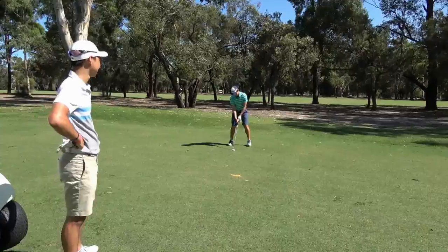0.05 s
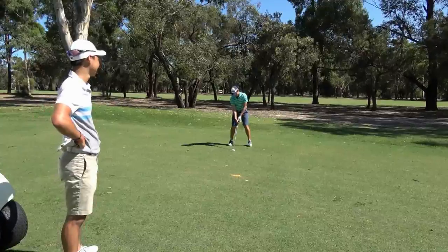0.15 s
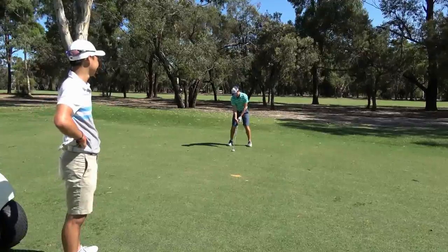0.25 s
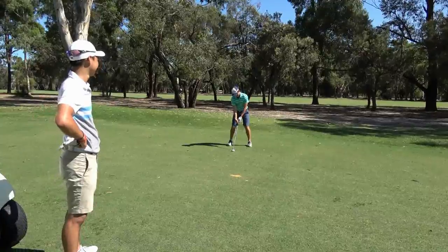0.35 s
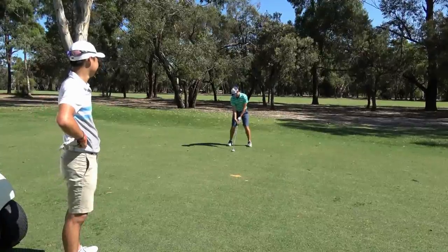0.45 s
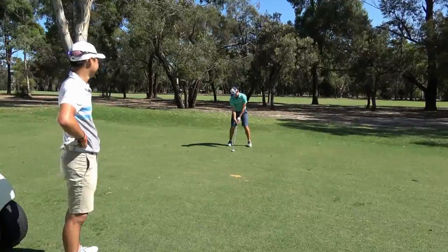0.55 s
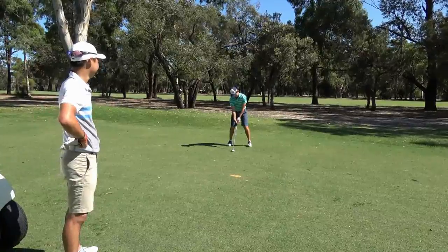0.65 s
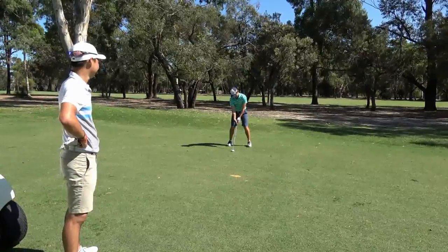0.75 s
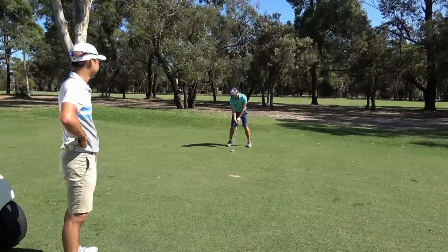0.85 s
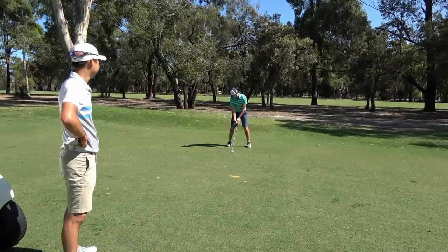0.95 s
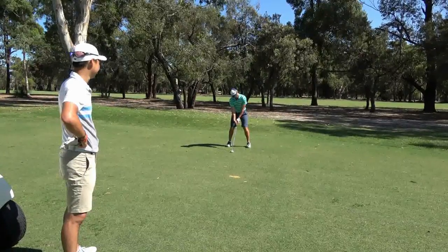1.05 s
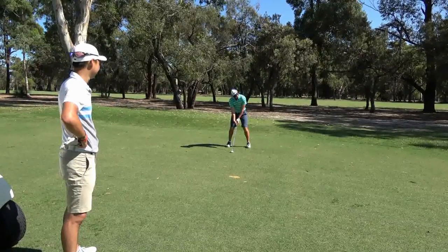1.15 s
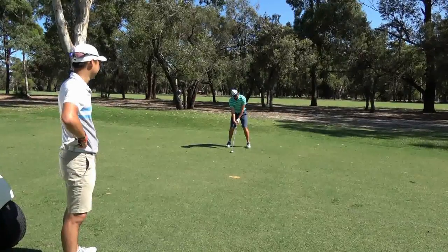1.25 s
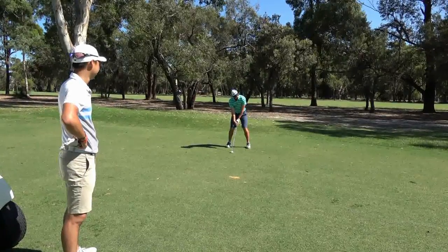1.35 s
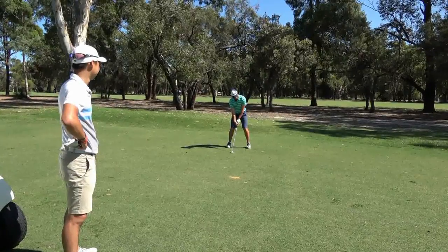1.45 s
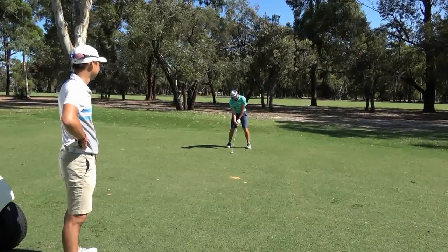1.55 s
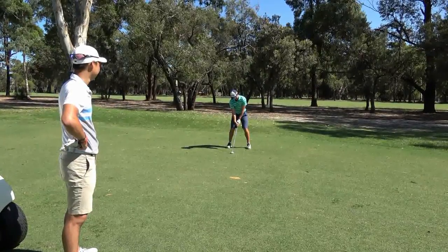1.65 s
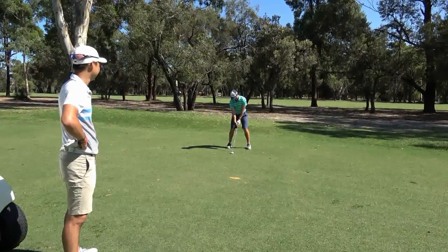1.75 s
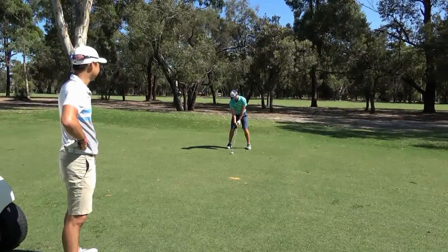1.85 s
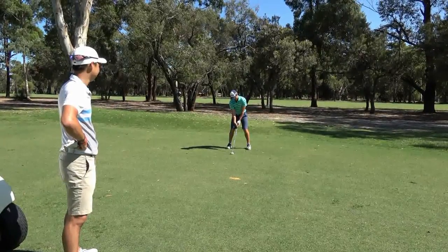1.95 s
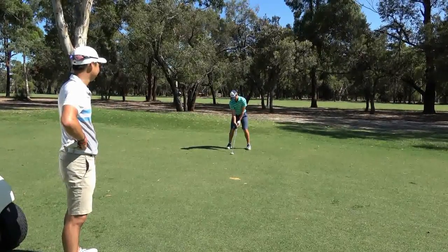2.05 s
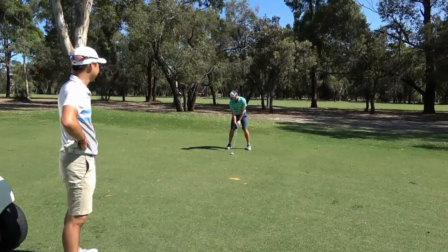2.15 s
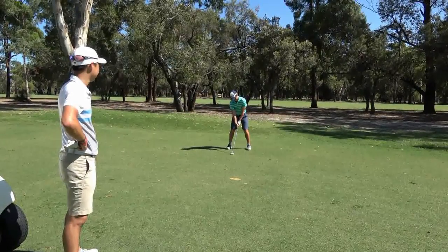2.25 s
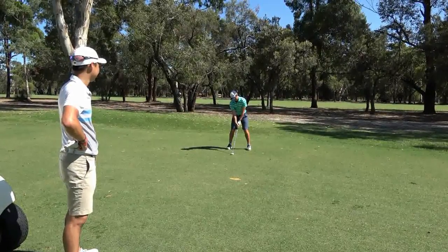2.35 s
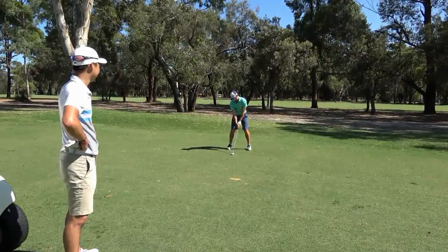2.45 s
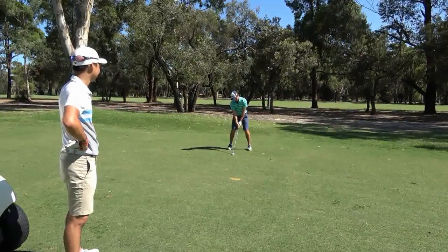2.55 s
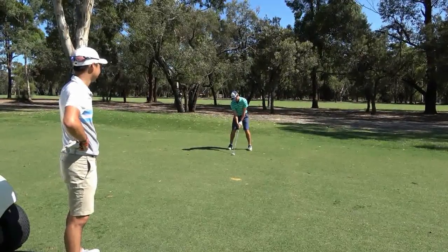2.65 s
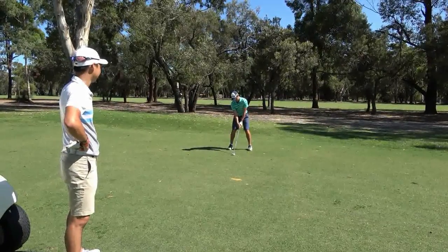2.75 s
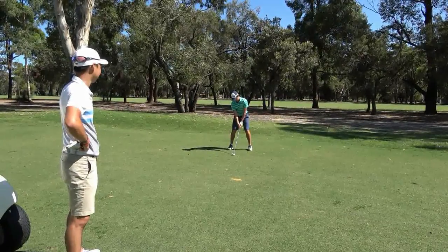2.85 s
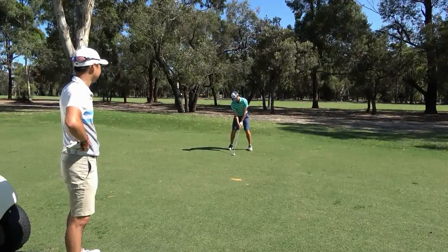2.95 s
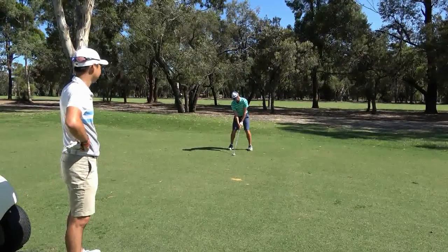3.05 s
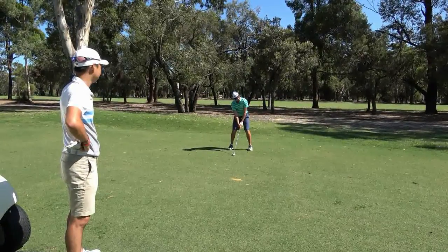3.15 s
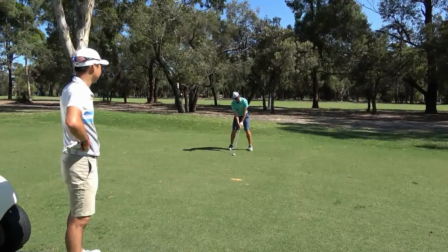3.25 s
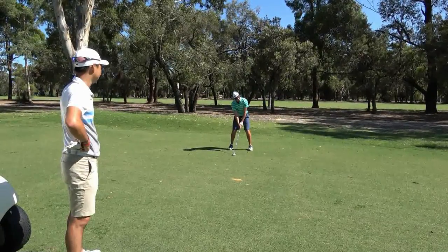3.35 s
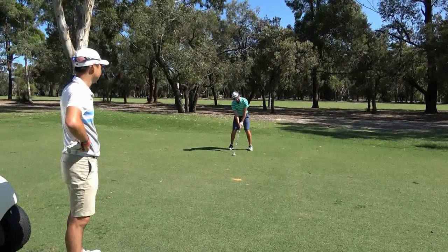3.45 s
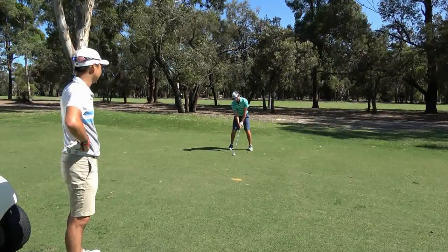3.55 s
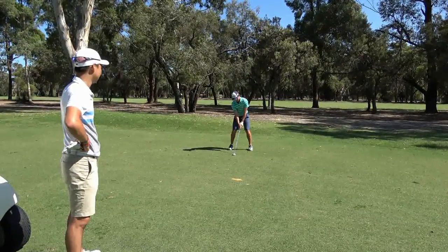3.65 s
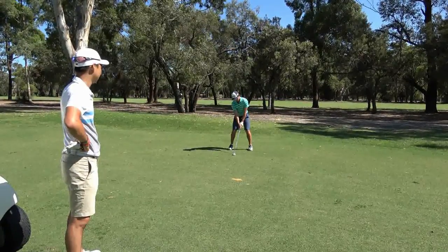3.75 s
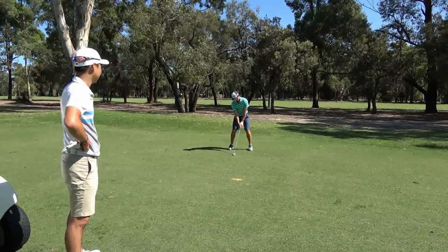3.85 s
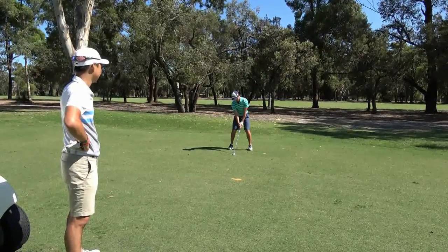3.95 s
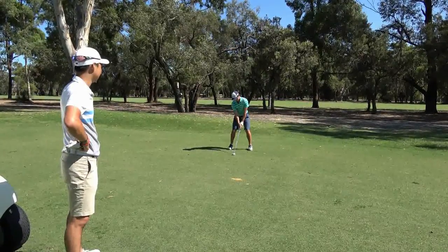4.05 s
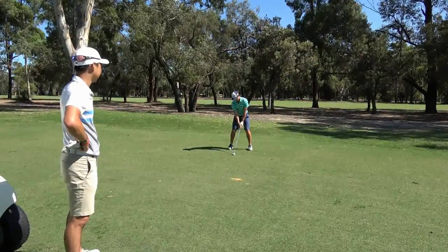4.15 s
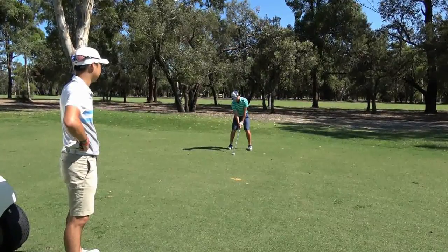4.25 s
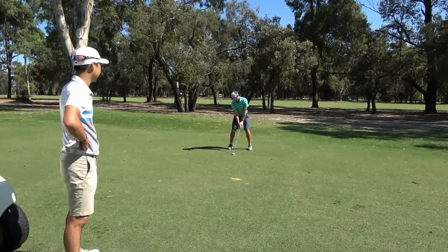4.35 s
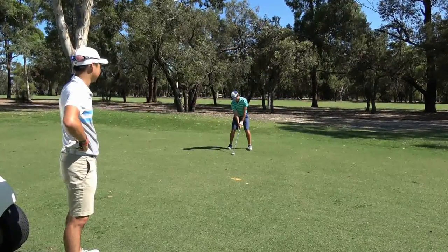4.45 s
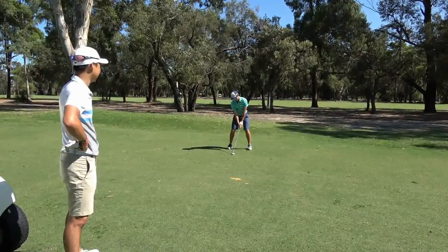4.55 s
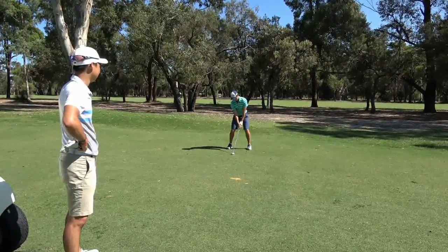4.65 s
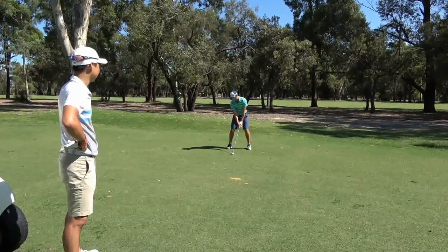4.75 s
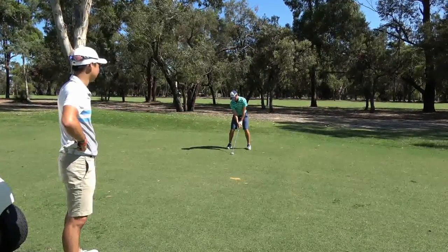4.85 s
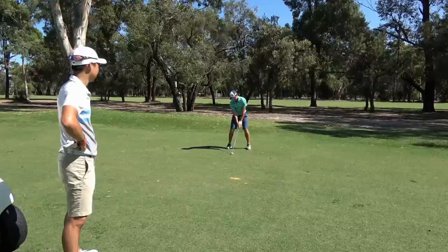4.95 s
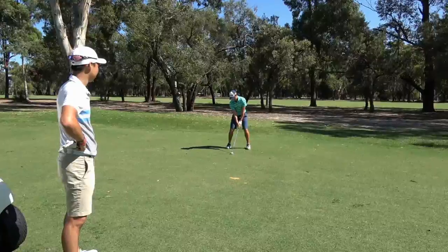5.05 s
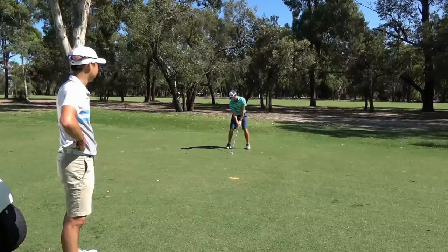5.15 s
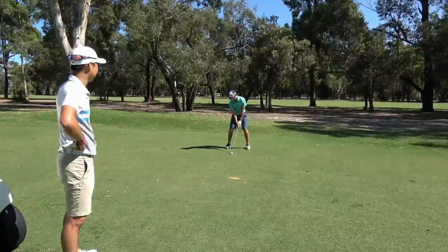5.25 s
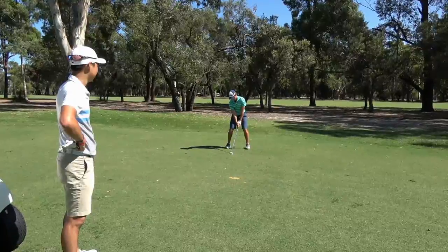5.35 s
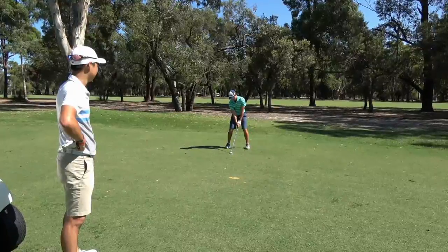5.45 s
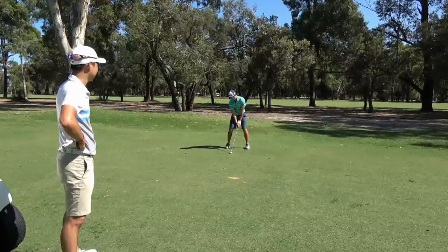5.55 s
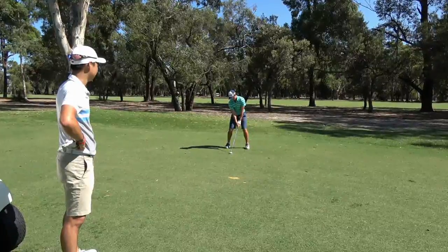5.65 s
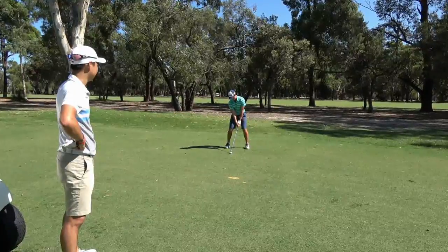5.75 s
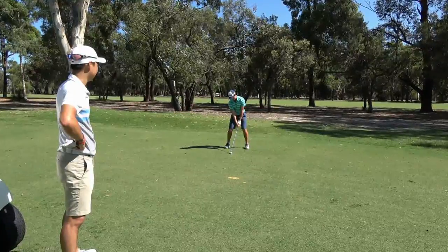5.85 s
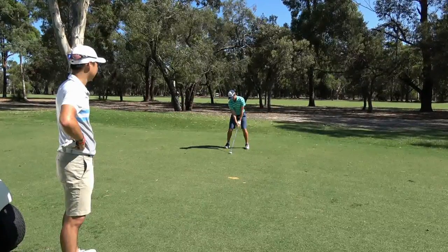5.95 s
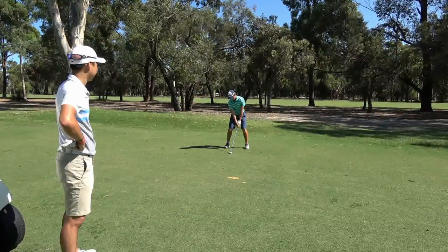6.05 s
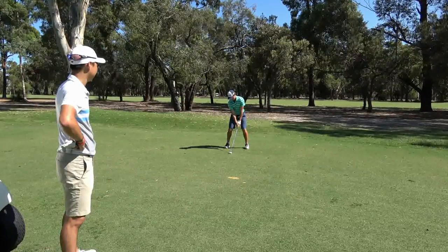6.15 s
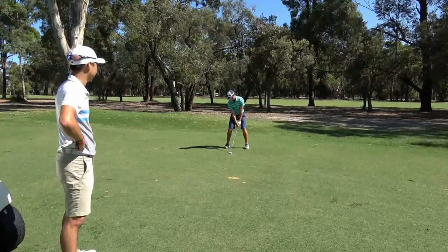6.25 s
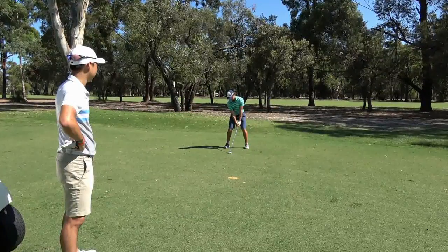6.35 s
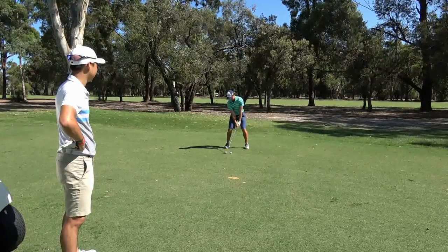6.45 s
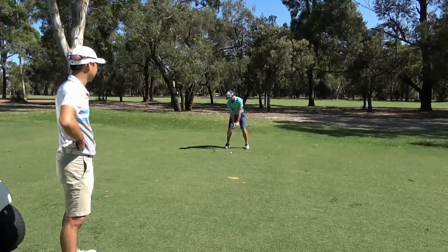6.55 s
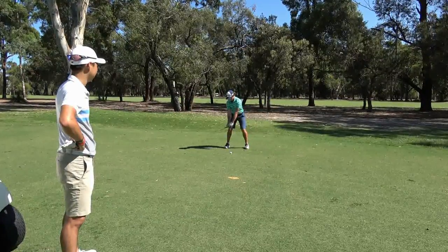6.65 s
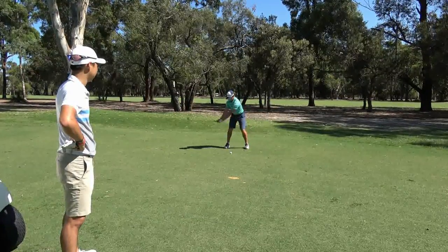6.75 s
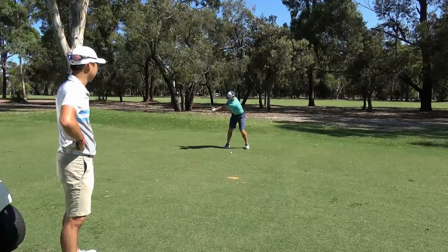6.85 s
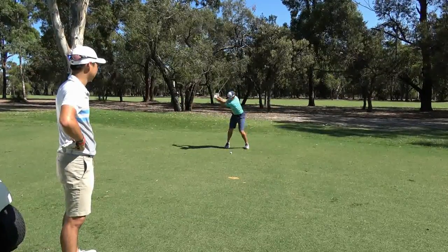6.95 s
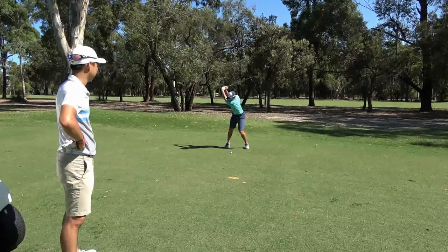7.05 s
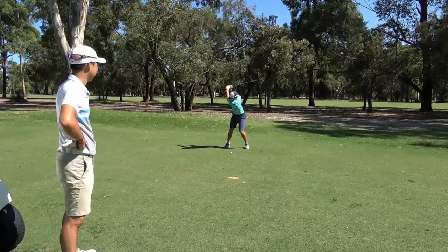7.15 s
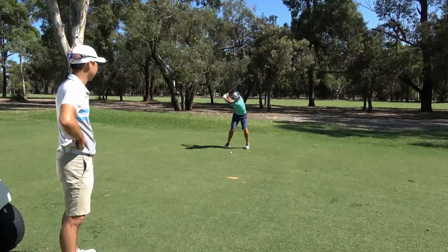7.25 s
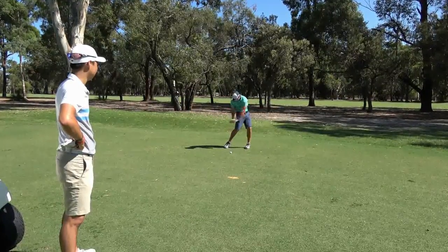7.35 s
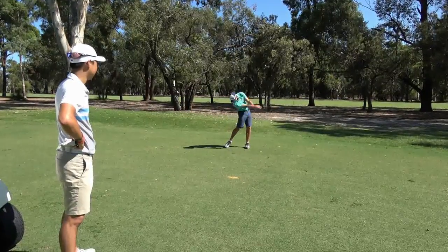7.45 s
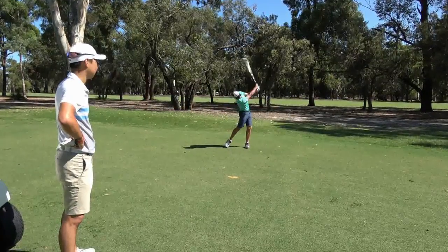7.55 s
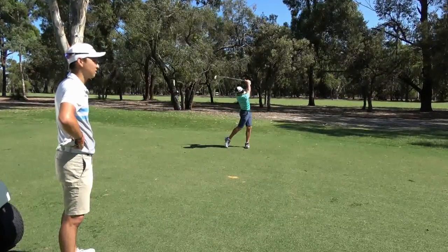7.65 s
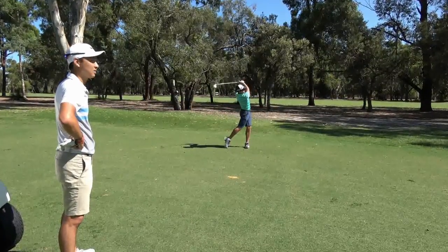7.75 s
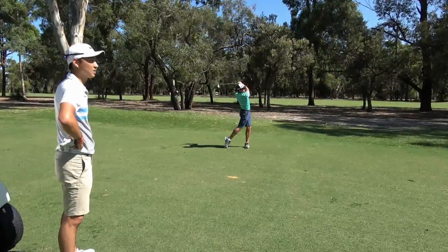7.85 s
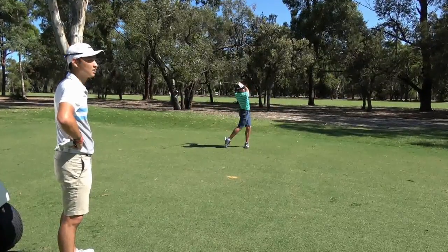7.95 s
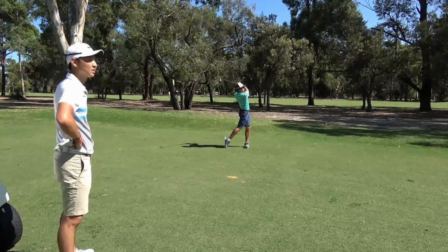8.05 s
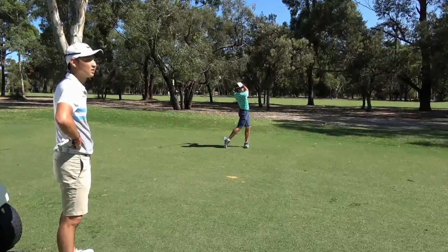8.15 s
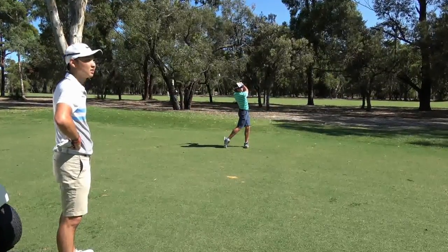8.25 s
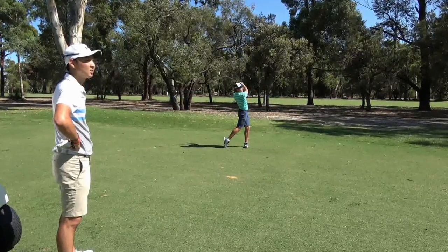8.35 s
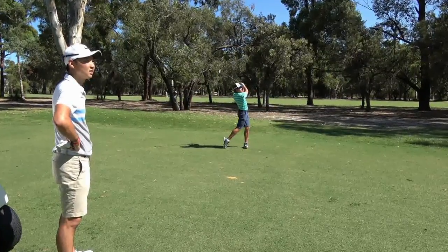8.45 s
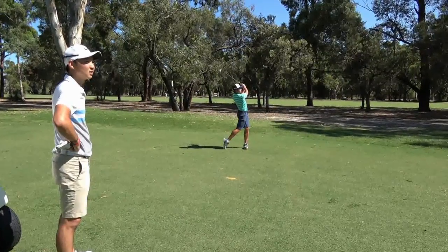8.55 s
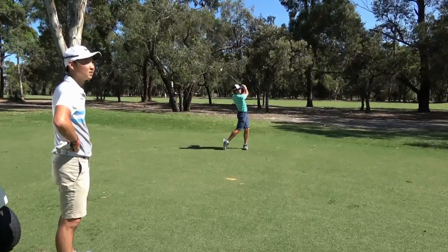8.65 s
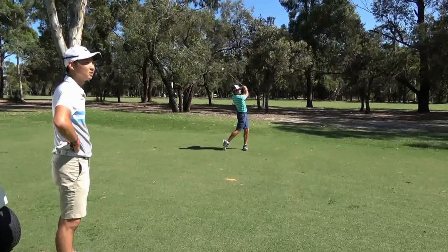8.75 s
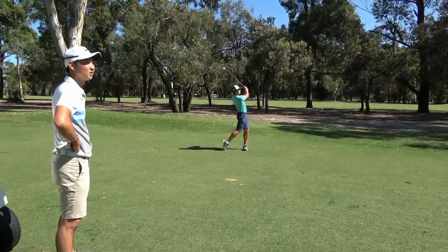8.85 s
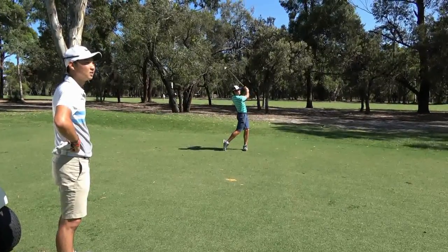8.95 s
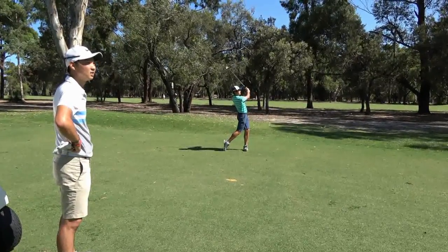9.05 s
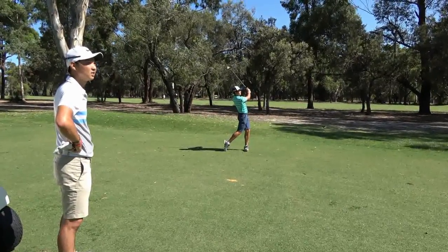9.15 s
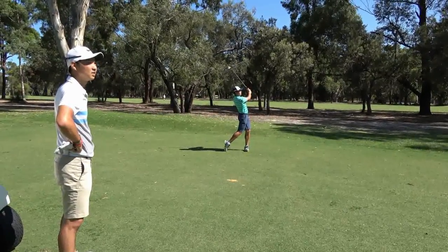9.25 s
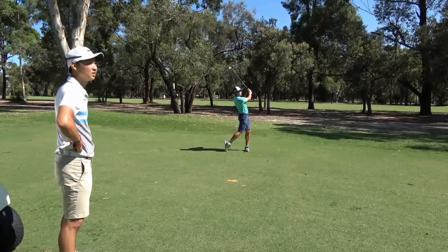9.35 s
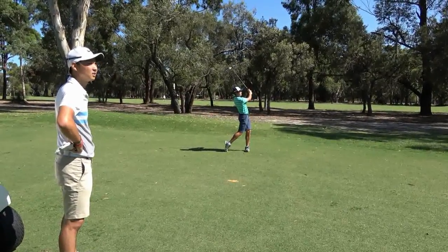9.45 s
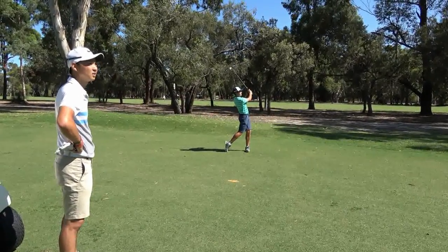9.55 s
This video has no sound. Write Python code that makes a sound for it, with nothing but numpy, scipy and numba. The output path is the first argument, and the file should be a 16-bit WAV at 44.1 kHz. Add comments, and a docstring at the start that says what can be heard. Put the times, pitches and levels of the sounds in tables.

```python
"""Golf shot among trees

A golf iron swishes down, shedding vortices, and cracks a ball: damped clubface modes, then copies and a noise tail
from the ground and trees. Parrots whistle in sliding harmonic notes with echoes from the trees.
Wind buffets the microphone as gusting low noise, leaves and far traffic hiss as flickering octave bands,
and a thin tone of two harmonics wavers far off."""
import sys
import numpy as np
from scipy import signal
from scipy.fft import rfft, irfft, next_fast_len
from scipy.io import wavfile
from scipy.ndimage import uniform_filter1d, minimum_filter1d
from numba import njit

SR = 44100
rng = np.random.default_rng(int(sys.argv[2]) if len(sys.argv) > 2 else 0)


def generate_wav(signal):
    """Clip the signal to [-1, 1] and save it as 16-bit WAV at the path in sys.argv[1]."""
    frames = np.transpose(np.atleast_2d(signal))
    scaled = np.clip(frames, -1, 1) * 32767
    pcm = np.round(scaled).astype(np.int16)
    wavfile.write(sys.argv[1], SR, pcm)


N = 423801
T = np.arange(N) / SR


def strike():
    """Impulsive excitation of damped modes: a blow rings the clubface, filtered copies arrive, the wood scatters a tail."""
    # modes of clubface and ball: (frequency [Hz], relative level [dB], t60 [s])
    modes = [(1260, -13, .018), (1650, -15, .015), (2050, -7, .014), (2400, -2, .012), (2850, -1, .013),
             (3300, -6, .012), (4100, -8, .012), (4700, -17, .01), (5640, -12, .009), (6500, -19, .007),
             (8010, -10, .006), (9100, -13, .006), (10600, -17, .006), (14100, -10, .004)]
    # arrivals of the crack, direct, off the ground, later off trunks:
    # (time [s], peak before flattening [dB], thinned below [Hz], dulled above [Hz])
    arrivals = [(7.4480, 8, 300, 18000), (7.4502, 6, 300, 4500), (7.4521, -8, 300, 4000),
                (7.454, -15, 900, 5000), (7.496, -21, 1500, 3000), (7.5382, -18, 2500, 9000),
                (7.5425, -11, 3200, 4800), (7.552, -17, 2200, 5500), (7.564, -17, 3200, 4800)]
    # replies of the stands of trees: (time [s], relative level [dB], rise [s], t60 [s])
    replies = [(7.455, -35, 0.032, 1.2), (7.535, -23.5, 0.0046, .25), (7.535, -30.5, 0.0045, 0.92)]
    # spectrum of the wood's answer: (frequency [Hz], relative density [dB per Hz])
    wood_colour = [(530, -41), (900, -18), (1290, -2.5), (1610, -7), (1960, 1), (2130, -5), (2310, -2),
                   (3270, -8), (3700, 0.5), (4200, -3), (4750, -12.5), (11600, -28), (13300, -36),
                   (13800, -77)]
    front_hz = 2200
    treble_db, treble_loss_db_per_s = 4.5, 21
    ceiling = .72

    t = T[:SR // 10]
    ring = np.zeros(len(t))
    for hz, db, t60 in modes:
        # the upper modes start together in a hard front; the lowest swing against them
        polarity = np.sign(hz - front_hz)
        ring += polarity * undb(db) * np.sin(2 * np.pi * hz * t) * 1000 ** (-t / t60)

    # the snap of the cover: a few milliseconds of bright noise
    snap_filter = signal.butter(1, [1500, 9000], "bandpass", fs=SR)
    snap = signal.lfilter(*snap_filter, rng.standard_normal(len(t)))
    ring += undb(-9) * snap * 1000 ** (-t / .014)

    crack = np.zeros(N)
    for s, db, thin_hz, dull_hz in arrivals:
        path_filter = signal.butter(2, [thin_hz, dull_hz], "bandpass", fs=SR)
        copy = signal.lfilter(*path_filter, ring)
        start = int(s * SR)
        crack[start:start + len(t)] += undb(db) * copy / np.abs(copy).max()
    # the sharpest swings of the crack overload the recorder and flatten
    crack = ceiling * np.tanh(crack / ceiling)

    # unrelated replies add in power
    wood_power = sum((undb(db) * swell(s, rise_s, t60_s)) ** 2 for s, db, rise_s, t60_s in replies)
    # later replies travel further and lose their top
    treble = undb(treble_db - treble_loss_db_per_s * np.clip(T - arrivals[0][0], 0, 1))
    # the two bands overlap slightly near 6 kHz
    scattered = noise(wood_colour, hi_hz=6100) + treble * noise(wood_colour, lo_hz=6000)
    return crack + np.sqrt(wood_power) * undb(1.3 * walk(100)) * scattered


def swing():
    """Vortex shedding: the shaft's pitch follows its speed; the head drags a low wake and bright rush, then digs in."""
    # the downswing: (time [s], vortex pitch of the shaft [Hz], shaft level [dB], bright rush level [dB])
    downswing = [(7.35, 350, -56, -70), (7.385, 474, -35, -52), (7.397, 600, -27, -38),
                 (7.409, 740, -19, -33), (7.418, 800, -20, -28), (7.424, 830, -19, -22),
                 (7.432, 890, -17, -18), (7.439, 890, -13, -24), (7.443, 950, -17, -40),
                 (7.451, 1050, -22, -42), (7.457, 680, -38, -52), (7.5, 448, -36, -60)]
    # spectrum of the rush and soil: (frequency [Hz], relative density [dB per Hz])
    rush_colour = [(620, -25), (1050, -4), (1430, -2.5), (1850, -5), (2780, -8), (3040, -7), (4100, -19),
                   (4780, -25), (12100, -33), (13600, -42), (14800, -107)]
    # thinner vortex streets: (multiple of the vortex pitch [1], level against the shaft [dB])
    overtones = [(2.1, -12), (3.3, -18)]
    rush_per_shaft = 2.6  # centre of the rush as a multiple of the vortex pitch
    wake_hz, wake_db = 400, -3.5  # low wake of the head; level against the shaft
    thud_db, spray_db = -21.5, -39

    hz, shaft_db, rush_db = track(downswing)
    moving = (T > downswing[0][0]) & (T < downswing[-1][0])
    # the head tears through the turf: a low thud and a spray of soil
    divot = swell(7.452, rise_s=0.027, t60_s=0.2)

    # the rush brightens as the club gathers speed
    rush = svf(noise(rush_colour), rush_per_shaft * hz, 1.5)
    out = moving * undb(rush_db) * rush / rush.std()
    out += undb(spray_db) * divot * noise(rush_colour)

    shaft = moving * undb(shaft_db)
    wake_and_thud = undb(wake_db) * shaft + undb(thud_db) * divot
    # (centre [Hz], bandwidth as a share of the centre, gain)
    streets = [(hz, .2, shaft), (np.full(N, float(wake_hz)), .7, wake_and_thud)]
    streets += [(k * hz, .2, undb(db) * shaft) for k, db in overtones]
    for centre_hz, share, gain in streets:
        band = svf(svf(rng.standard_normal(N), centre_hz, share), centre_hz, share)
        # divided by its short-term rms, so the gain alone sets the level
        out += gain * band / np.sqrt(uniform_filter1d(band ** 2, size=400))
    return out


def birds():
    """Frequency-modulated harmonics: parrot notes slide in, hold and slide out, with patchy flutter and tree echoes."""
    # notes: (start [s], length [s], pitch at onset [Hz], after the opening slide [Hz],
    # before the closing slide [Hz], at the end [Hz], level [dB], level change over the held part [dB],
    # octave overtone against the note [dB])
    notes = [ (1.73, .02, 3390, 3200, 3500, 3250, -51, 0, -30),
             (1.835, .038, 3900, 4200, 4500, 4350, -44, -1, -40),
             (1.87, .043, 4100, 4420, 4300, 3600, -42, 1, -40),
             (1.912, .04, 2500, 2450, 2400, 2350, -53, 0, -6),
             (1.948, .022, 2400, 2450, 2670, 2750, -46, 5, -14),
             (1.966, .02, 3850, 3750, 3700, 3250, -37, 0, -40),
             (1.983, .015, 3700, 3800, 3950, 4100, -37, 1, -40),
             (1.997, .024, 3700, 3800, 4100, 3900, -43, 0, -40),
             (2.035, .032, 3650, 3700, 3800, 3850, -52, 0, -40),
             (2.112, .017, 6000, 6030, 6050, 6500, -61.5, 0, -29.5),
             (2.165, .015, 5150, 5250, 5500, 5760, -63, 0, -29),
             (2.212, 0.017, 3990, 4150, 4350, 4500, -62.5, 0, -29),
             (2.925, .05, 1750, 1900, 1950, 2350, -47, 0, -10),
             (2.966, .04, 2700, 3250, 3520, 3500, -44, 4, -40),
             (2.998, .042, 3500, 3500, 3350, 3050, -41, -1, -40),
             (3.032, .07, 3150, 2900, 3050, 3100, -44, 0, -40),
             (3.1, .042, 3050, 3100, 3320, 3300, -49, 0, -40),
             (3.342, 0.033, 2700, 2700, 2860, 3000, -55, -1, -12),
             (3.364, .035, 3500, 3520, 3450, 3500, -52, 0, -30),
             (3.39, .04, 3900, 4150, 4450, 4550, -51, -2, -30),
             (3.396, .075, 4100, 4870, 4740, 4800, -35, -6, -35),
             (3.468, .06, 4780, 4780, 4880, 4850, -47, 0, -35),
             (3.535, .03, 4750, 4700, 4650, 4800, -51, 0, -35),
             (3.47, .035, 3600, 3600, 3500, 3450, -54, 0, -30),
             (3.5, .04, 2900, 2950, 3200, 3200, -54, 3, -5),
             (3.538, .04, 3550, 3420, 3600, 3800, -40, 0, -30),
             (3.534, .04, 3200, 3120, 3100, 3120, -56, 0, 1),
             (3.532, 0.032, 2290, 2320, 2200, 2450, -42, 0, -20),
             (3.568, .074, 2520, 2700, 2610, 2610, -35, -2, -13),
             (3.58, .068, 3600, 3700, 3500, 3480, -50, -3, -30),
             (3.632, .056, 2600, 2640, 2740, 2780, -33, -2, -11),
             (3.682, .022, 2750, 2830, 2900, 2950, -40, 0, -7),
             (3.698, .014, 2900, 2450, 2300, 2350, -43, 0, 1),
             (3.704, .03, 2950, 3080, 3050, 3000, -48, -3, -11),
             (4.403, .028, 2100, 2200, 2080, 1980, -46, 0, -25),
             (4.432, .026, 2050, 2150, 2380, 2450, -49, 2, -25),
             (4.533, .035, 2290, 2330, 2500, 2750, -52, -1, 1),
             (4.558, .032, 2350, 2400, 2400, 2150, -55, 2, 4),
             (4.588, .026, 2100, 2300, 2700, 3000, -54, -3, -5),
             (4.595, 0.044, 1823, 2000, 1850, 1700, -50, 0, -30),
             (4.605, .045, 2750, 2850, 2720, 2950, -47, -3, -12),
             (4.722, .05, 1640, 1675, 1570, 1660, -46, -8, -30),
             (5.007, 0.082, 2254, 2160, 2300, 2300, -51, -4, -8),
             (5.846, 0.034, 2080, 2230, 2300, 2100, -42, 1, -25),
             (5.852, 0.026, 3960, 3880, 3900, 3950, -43, -3, -35),
             (5.875, 0.028, 4030, 3800, 3400, 3400, -41, 2, -35),
             (5.884, .04, 2290, 2420, 2400, 2500, -44, -4, -20),
             (5.933, .062, 3720, 3830, 3850, 3620, -36, 3, -35),
             (5.992, 0.016, 3450, 3300, 3410, 3410, -41, -3, -40),
             (6.006, .016, 2100, 2120, 2120, 2050, -47, 0, -20),
             (6.024, .02, 2000, 2200, 2300, 2400, -41, 0, -12),
             (6.038, .018, 2500, 2650, 2750, 3000, -45, 0, -14),
             (6.008, 0.039, 3810, 3880, 3850, 3800, -46.5, 1, -35),
             (6.042, .05, 3380, 3900, 4010, 3880, -34, -2, -36),
             (6.11, 0.021, 3830, 3800, 4000, 4000, -51, -1, -24),
             (6.132, .032, 3980, 4040, 3850, 3500, -51, -4, -22),
             (6.196, .018, 3810, 3840, 4000, 4000, -54, -4, -25),
             (6.781, 0.064, 5290, 5100, 5000, 5200, -57, 1, -31),
             (8.562, .036, 2350, 2170, 2200, 2200, -47, 0, -3),
             (8.593, .046, 2200, 2180, 2150, 2150, -42, 3, -11),
             (8.63, .036, 2350, 2400, 2230, 2130, -47, -2, -6),
             (8.7, 0.052, 2210, 2180, 2200, 2500, -52, 0, -20),
             (8.815, 0.06, 2040, 2100, 2100, 2250, -48.5, 1, -5),
             (9.106, .02, 4000, 4250, 5100, 5200, -59, 2, -35),
             (9.137, .042, 3650, 3050, 3250, 3500, -47, 1, -20),
             (9.176, .03, 4300, 4200, 4500, 4450, -47, -2, -30),
             (9.172, .08, 4450, 4940, 4950, 4650, -32, -5, -19),
             (9.183, .055, 3380, 3600, 3300, 3100, -50, -3, -12),
             (9.252, .1, 4900, 4980, 4970, 4950, -45, -6, -25),
             (9.206, .05, 3050, 3350, 3550, 3300, -51, 0, -30),
             (9.252, .04, 3000, 2920, 3050, 3200, -48, 0, -4),
             (9.36, .03, 2253, 2200, 2500, 2500, -47, 2, -30),
             (9.288, .1, 3150, 3350, 3350, 3750, -42, 0, -12),
             (9.38, .06, 2300, 2660, 2780, 2800, -33, 0, -8),
             (9.428, .056, 2790, 2820, 2610, 2680, -36, 0, -3),
             (9.478, .027, 2680, 2850, 3100, 3240, -43, -4, -12), ]
    slide_in_s, slide_out_s = .016, .014  # longest slides, each at most a third of the note
    edge_db = -10  # softness at the ends of a note
    clear_db, hoarse_db = -35, -51  # notes this loud are cleanest, notes this faint most broken up by distance
    trunk_s, trunk_db = .066, -19  # one near stand of trunks returns each whistle once, distinctly

    out = np.zeros(N)
    flutter, shake, rasp = walk(110), walk(300), walk(1600)
    for s, length, *pitch_hz, db, change_db, octave_db in notes:
        a, b = int(s * SR), int((s + length) * SR)
        opening = min(slide_in_s / length, 1 / 3)
        closing = min(slide_out_s / length, 1 / 3)
        joints = [0, opening, 1 - closing, 1]
        progress = np.linspace(0, 1, b - a)
        loudness_db = db + max(change_db, 0) / 2
        far = np.clip((loudness_db - clear_db) / (hoarse_db - clear_db), 0, 1)

        hz = uniform_filter1d(np.interp(progress, joints, pitch_hz), size=150)
        phase = 2 * np.pi * np.cumsum(hz * (1 + (.004 + .016 * far) * shake[a:b])) / SR
        # the overtones break up more than the note itself, on another stretch of the flutter
        overtone_gain = undb(octave_db + 2.5 * flutter[a + 2000:b + 2000])
        voice = np.sin(phase) + overtone_gain * (np.sin(2 * phase) + undb(-30) * np.sin(3 * phase))

        level_db = db + np.interp(progress, joints, [edge_db, 0, change_db, change_db + edge_db])
        voice *= undb(level_db + (1.8 + 2.6 * far) * flutter[a:b])
        voice *= 1 + (.08 + .35 * far) * rasp[a:b]
        out[a:b] += np.sqrt(2) * voice * signal.windows.tukey(b - a, .15)

    # a patchy, fading haze of echoes from the trees, with one fainter distinct return
    t = T[:SR // 2]
    patches = undb(3 * walk(60)[:len(t)])
    echoes = rng.standard_normal(len(t)) * patches * 1000 ** (-t / .4) * np.minimum(t / 0.01, 1)
    echoes /= np.sqrt(np.sum(echoes ** 2))
    trunk = undb(trunk_db + 3 * flutter) * np.roll(out, int(trunk_s * SR))
    return out + trunk + undb(-8.5) * signal.fftconvolve(out, echoes)[:N]


def wind():
    """Turbulent pressure: eddies on the microphone rumble with the gusts; the largest swings are rounded."""
    # gusts: (time [s], rumble level before rounding [dB])
    gusts = [(0.0, -18), (0.3, -20.5), (0.53, -13), (0.75, -23.5), (1.75, -19.5), (2.02, -12.5),
             (2.65, -12), (3.2, -20.5), (3.5, -20), (4.15, -18), (4.5, -22), (5.6, -19), (6.05, -11.5),
             (6.5, -11.5), (7.3, -12), (7.5, -16), (7.9, -13), (8.7, -13), (9.0, -11.5), (9.35, -14.5),
             (9.6, -12)]
    # spectrum of the buffeting: (frequency [Hz], relative density [dB per Hz])
    rumble_colour = [(7.1, -30.5), (12, -4), (38, 0.5), (67, -1), (95, -6.5), (128, -15.5), (187, -26.5),
                     (206, -31), (252, -34.5), (300, -35.5), (390, -70), (660, -120)]
    buffet_db, buffets_per_s = 2, 7
    ceiling = 0.81

    gust_db, = track(gusts)
    rumble = undb(gust_db + buffet_db * walk(buffets_per_s)) * noise(rumble_colour)
    # one sharper buffet reaches higher than the rumble
    bump = noise(rumble_colour, lo_hz=129, hi_hz=420)
    bump *= undb(-25) * swell(2.635, rise_s=.02, t60_s=.25) / bump.std()
    return ceiling * np.tanh(rumble / ceiling) + bump


def hiss():
    """Band-filtered noise: octaves swell together and flicker alone; the treble rises with the rustle of leaves."""
    # distant hiss: (time [s], level before a 7 dB lift [dB], treble lift in the top octave [dB])
    swells = [(0.03, -43, 0), (0.96, -38.5, -5), (1.78, -40, -1.5), (3.05, -39, -2), (4.61, -36.5, -1),
              (5.97, -34.5, -1.5), (7.1, -40.5, 2), (7.59, -35, -1), (7.85, -38.5, 0.5),
              (8.25, -36.5, -0.5), (9.55, -37, 5)]
    # spectrum of leaves and far traffic: (frequency [Hz], relative density [dB per Hz])
    air_colour = [(65, -31.5), (110, -4.5), (147, -7.5), (266, -22), (348, -22), (558, -23.5),
                  (1120, -28.5), (1500, -29.5), (1730, -34), (3020, -40), (5150, -51), (11200, -61.5),
                  (12000, -61), (12700, -96), (15000, -100)]

    db, lift_db = track(swells)
    edges_hz = 100 * 2 ** np.arange(9)
    rustle_db = walk(9) + walk(45)
    bands = np.zeros(N)
    for k, (lo, hi) in enumerate(zip(edges_hz, edges_hz[1:])):
        tilt = k / 7  # 0 in the lowest octave, 1 in the highest
        band_db = tilt * (lift_db + rustle_db) + .5 * walk(6)
        bands += undb(band_db) * noise(air_colour, lo, hi)
    return undb(db + 7) * bands


def tone():
    """Amplitude and frequency modulation: a thin, slightly unsteady tone fades in and out on the moving air."""
    # thin far tone: (time [s], frequency [Hz], level before fading [dB])
    drift = [(0.0, 1508, -49.5), (0.55, 1500, -49.5), (0.7, 1498, -40.5), (0.9, 1504, -43),
             (1.02, 1499, -47.5), (1.2, 1497, -63), (1.43, 1498, -52), (1.57, 1500, -61), (1.82, 1510, -45),
             (1.9, 1508, -56), (2.3, 1506, -54), (2.6, 1508, -52.5), (3.4, 1526, -53), (3.8, 1535, -49),
             (4.15, 1529, -51.5), (4.4, 1522, -51), (4.6, 1533, -55), (4.75, 1527, -60), (5.22, 1505, -47),
             (5.4, 1527, -55), (5.56, 1522, -44), (6.13, 1513, -57.5), (6.31, 1516, -50), (6.45, 1520, -62),
             (6.82, 1510, -49), (7.06, 1510, -59), (7.67, 1515, -55.5), (8.37, 1526, -52.5),
             (8.68, 1524, -56), (8.72, 1550, -41), (9.04, 1515, -52), (9.28, 1528, -53), (9.36, 1530, -38),
             (9.52, 1526, -42.5), (9.6, 1526, -43)]
    fading_db, fades_per_s = 2, 9
    firm_db, octave_db = -39, -19.5

    hz, db = track(drift)
    # it holds steadier when strong
    unsteadiness = np.clip((firm_db - db) / 10, .15, 1)
    db = db + unsteadiness * (fading_db * walk(fades_per_s) + 2.95 * walk(25))
    phase = 2 * np.pi * np.cumsum(hz * (1 + 0.002965 * walk(40))) / SR
    return np.sqrt(2) * undb(db) * (np.sin(phase) + undb(octave_db) * np.sin(2 * phase))


def undb(db):
    """Decibel law: a level becomes an amplitude ratio."""
    return 10 ** (np.asarray(db) / 20)


def track(rows):
    """Linear interpolation: columns of a table joined by straight lines in time."""
    s, *columns = np.transpose(rows)
    return [np.interp(T, s, c) for c in columns]


def swell(start_s, rise_s, t60_s):
    """Exponential decay: a straight rise to 1, then a fade of 60 dB per t60."""
    t = T - start_s
    return np.clip(t / rise_s, 0, 1) * 1000 ** (-np.clip(t - rise_s, 0, 3) / t60_s)


def walk(rate):
    """Smoothed random modulation: levels held 1 / rate s and slewed twice; spread near 1."""
    k = int(SR / rate)
    held = np.repeat(rng.standard_normal(N // k + 1), k)
    return 1.312 * uniform_filter1d(uniform_filter1d(held, k), k)[:N]


def noise(colour, lo_hz=0, hi_hz=SR):
    """Spectral shaping of white noise: rms 1 over the whole spectrum; only lo..hi is returned."""
    size = next_fast_len(N)
    hz = np.arange(size // 2 + 1) * SR / size + 1e-3  # offset keeps the logarithm finite
    point_hz, point_db = np.transpose(colour)
    gain = undb(np.interp(np.log(hz), np.log(point_hz), point_db, -150, -150))
    gain = gain / np.sqrt(np.mean(gain ** 2))
    gain = gain * ((hz >= lo_hz) & (hz < hi_hz))
    return irfft(rfft(rng.standard_normal(size)) * gain, size)[:N]


@njit
def svf(x, hz, share):
    """State-variable resonance: a band-pass whose centre moves; width is a share of the centre."""
    y, b, l = np.empty(len(x)), 0., 0.  # b and l: band-pass and low-pass states
    for i in range(len(x)):
        g = np.tan(np.pi * hz[i] / SR)
        v = (b + g * (x[i] - l)) / (1 + g * (g + share))
        b, l, y[i] = 2 * v - b, l + 2 * g * v, share * v
    return y


def scene():
    """Superposition: all sources add in the air as one channel."""
    return (strike() + swing() + birds() + wind() + hiss() + tone())[None]


def record(dry):
    """Gain limiting and low-pass filtering: a quick limiter dips around the loudest peaks; the top is cut."""
    top_hz = 15200
    peak = -minimum_filter1d(-np.abs(dry), size=300)
    gain = uniform_filter1d(np.minimum(1, .84 / peak), size=200)
    top_cut = signal.ellip(8, .2, 80, top_hz, fs=SR, output="sos")
    return signal.sosfilt(top_cut, dry * gain)


dry = scene()
out = record(dry)
generate_wav(out)
```